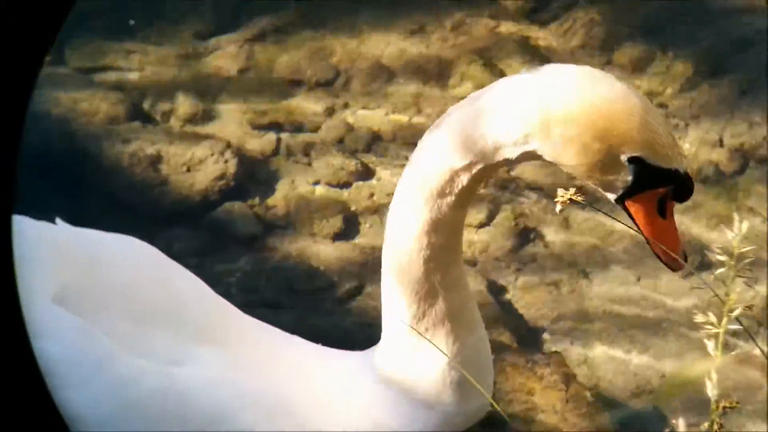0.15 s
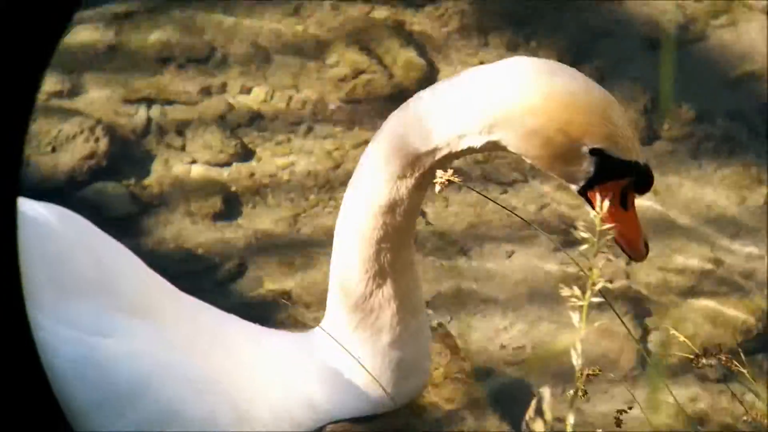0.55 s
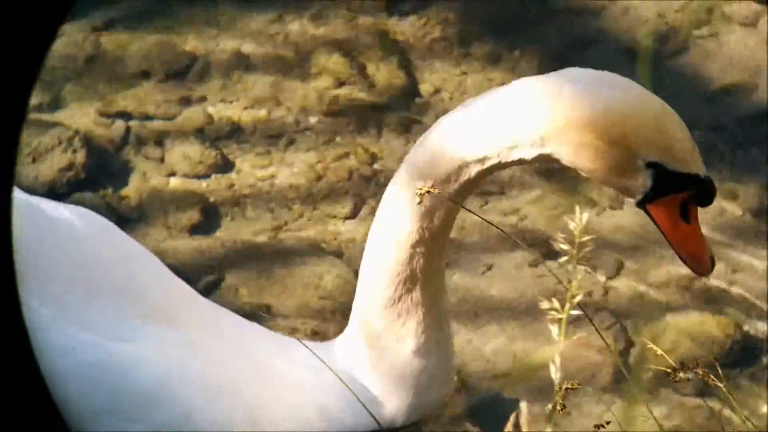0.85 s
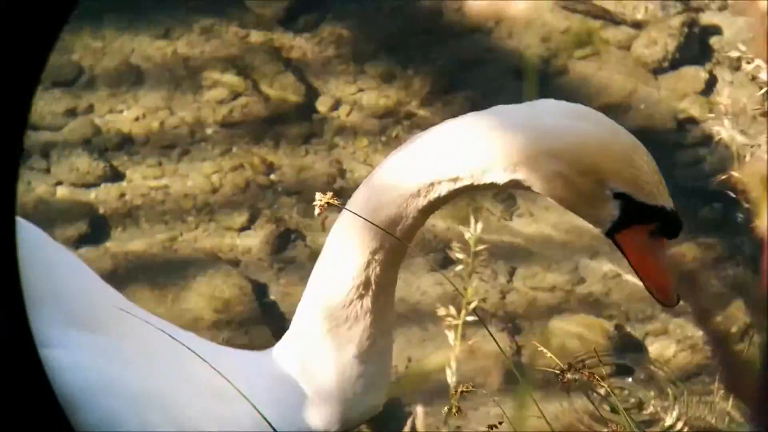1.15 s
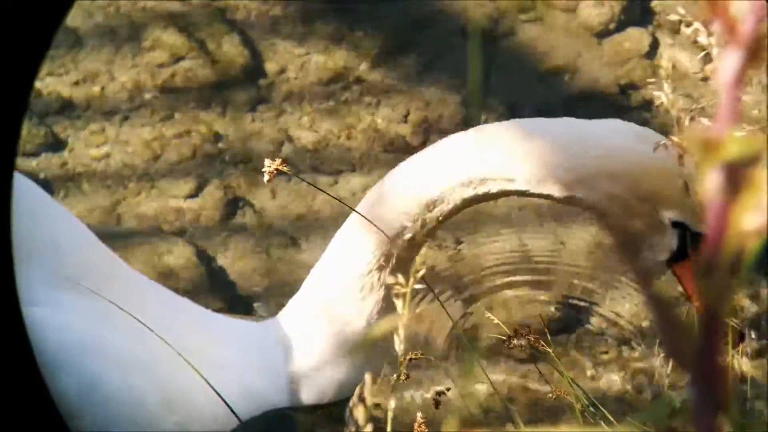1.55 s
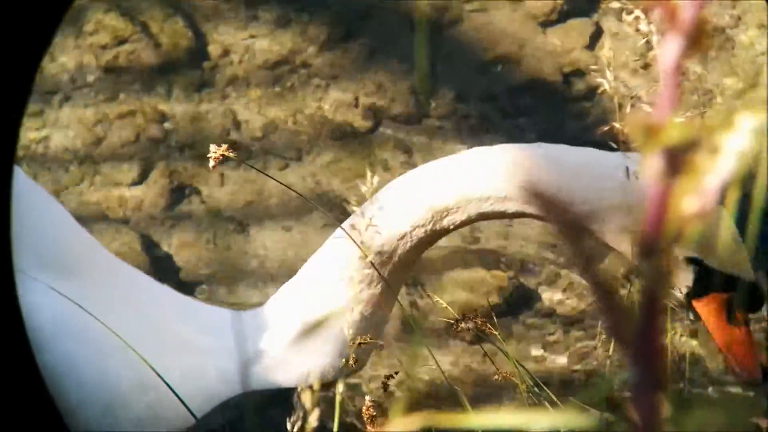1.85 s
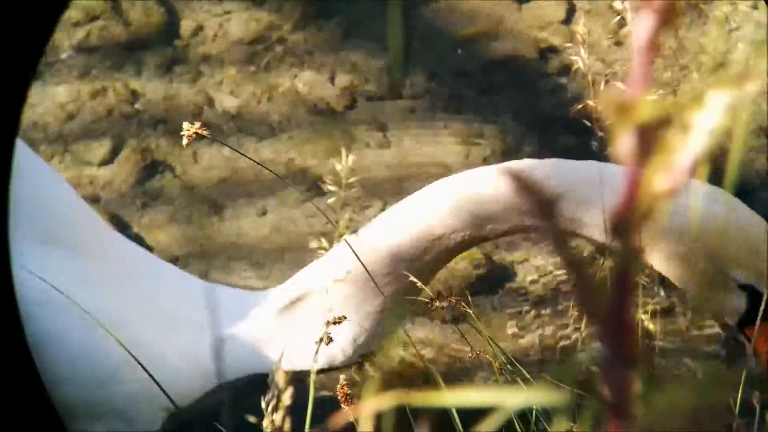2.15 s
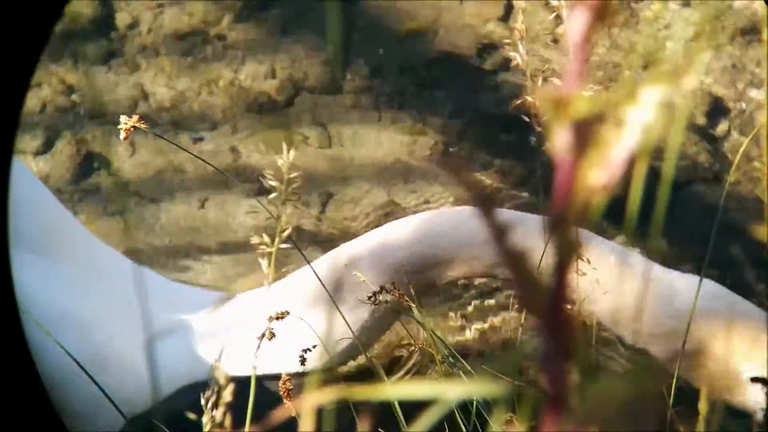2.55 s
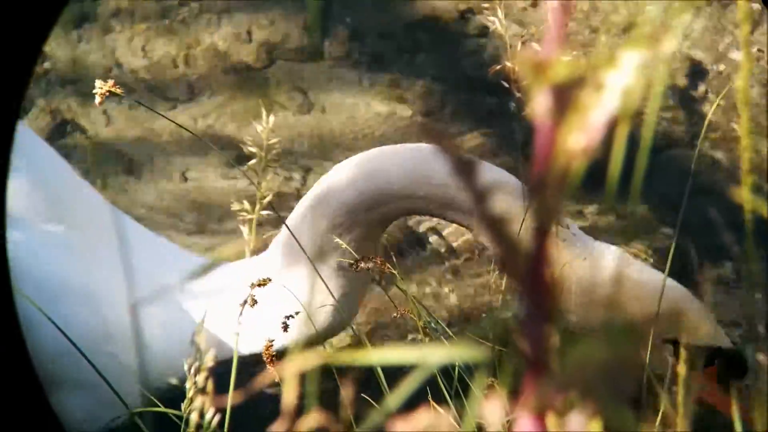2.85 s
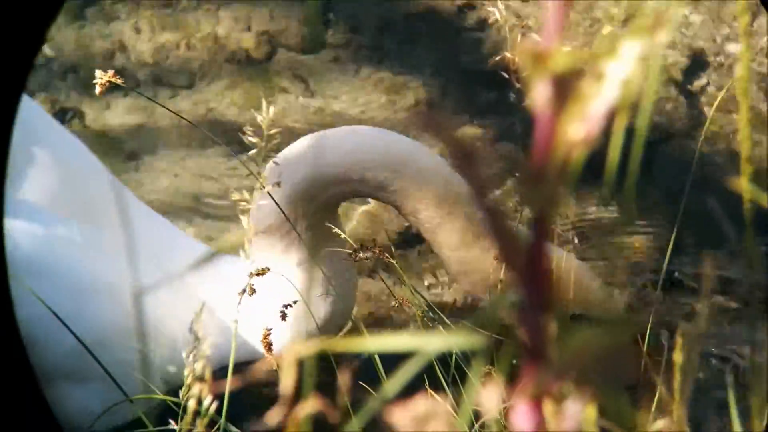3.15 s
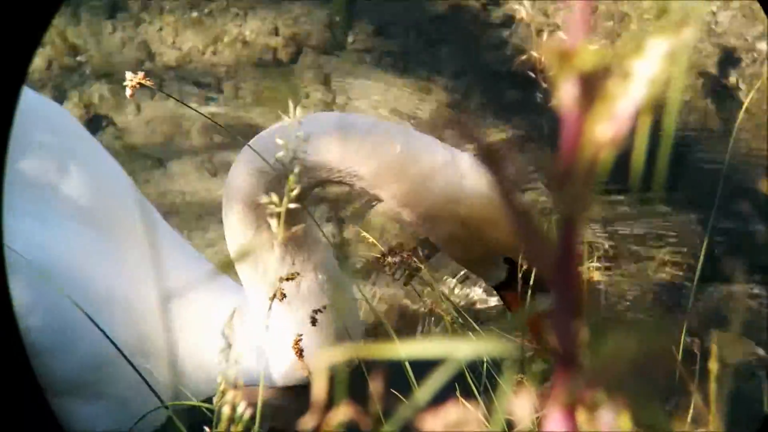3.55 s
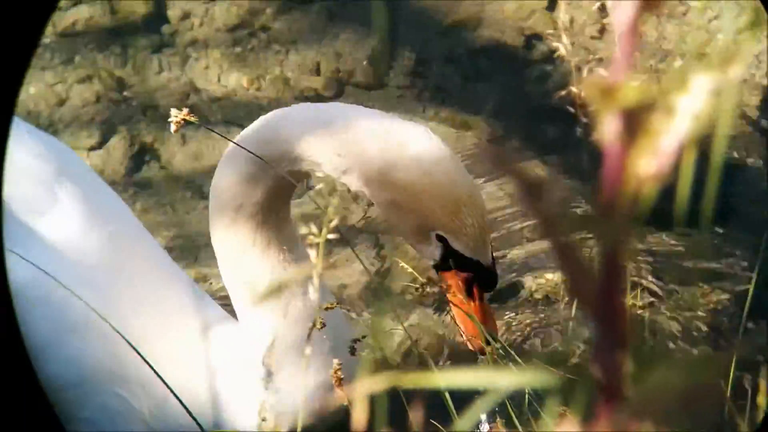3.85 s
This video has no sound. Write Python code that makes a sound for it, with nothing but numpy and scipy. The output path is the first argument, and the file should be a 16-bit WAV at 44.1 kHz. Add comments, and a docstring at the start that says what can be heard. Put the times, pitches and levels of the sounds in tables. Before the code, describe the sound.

A swan hisses, long and breathy, from the start, darkening and sputtering out at about 1.1 seconds. Small wet puffs follow. From 1.5 seconds it snorts, the air flapping unevenly and swelling to a rough rush around 3 seconds, then sinking to a low flutter from 3.4 to 4 seconds. Soft low bumps and quiet outdoor air lie underneath, with two faint ticks near 2.7 and 2.8 seconds.

```python
"""Swan hiss and snort.

A swan forces out one long, breathy hiss that darkens and sputters out. It then snorts:
air flaps unevenly through its wet airway, swells to a rough rush and sinks to a low flutter.
Both are turbulence noise shaped by the airway's resonances.
Soft low bumps, two faint ticks and quiet outdoor air lie underneath."""
import sys
import numpy as np
from scipy import signal
from scipy.fft import rfft, irfft
from scipy.io import wavfile
from scipy.ndimage import uniform_filter1d, map_coordinates

SR = 44100
rng = np.random.default_rng(int(sys.argv[2]) if len(sys.argv) > 2 else 0)


def wrap_up_sound(samples):
    """Save the sound to the file named by the first command line argument, as 16-bit audio."""
    columns = np.atleast_2d(samples).T
    # keep every value between -1 and 1, then stretch to whole-number steps
    tamed = np.clip(columns, -1, 1)
    steps = np.round(tamed * 32767).astype(np.int16)
    wavfile.write(sys.argv[1], SR, steps)


N = 176400
TIME = np.arange(N) / SR
FREQS = np.maximum(np.arange(N // 2 + 1) * SR / N, 1)
WOBBLE_RATIO, WOBBLE_HZ = 0.01884, 12.02   # random wander of the snort and flutter resonances


def hiss(narrow_from_s=0.69, narrow_over_s=0.26, throat_rest_hz=1043.6, rough_db=1, rough_hz=29):
    """Forced air in four gliding bands plus a whistle; the broad bands fade as the sound narrows."""
    # Each row: time in seconds, then throat, middle, edge and treble level in dB before trim.
    levels = [(0.0, -47.5, -43.5, -44.5, -62), (0.048, -47, -49.5, -45, -63),
              (0.104, -42, -47.5, -38.5, -59), (0.216, -38.5, -40, -36.5, -58),
              (0.382, -39, -35, -41.5, -63), (0.492, -34.5, -35.5, -46.5, -61.5),
              (0.554, -37, -36.5, -55, -61.5), (0.712, -40.5, -38.5, -62, -63.5),
              (0.912, -41, -46.5, -84, -70), (1.022, -22, -47, -57, -66), (1.06, -47, -61, -62, -72),
              (1.09, -45, -59, -61, -71), (1.1, -58, -62, -62, -76)]
    # Each row: time in seconds, main throat resonance in Hz.
    throat_track = [(0, 1019), (.3, 1062), (.42, 1165), (.56, 1192), (.68, 1020), (.95, 1041), (1.1, 920)]
    # Each row: resonance in Hz before the glide, width in Hz, relative level in dB.
    throat_modes = [(290, 195, -16), (552, 150, -16), (746, 126, -4.5), (1047, 108, 3.5), (1285, 250, -10)]
    middle_modes = [(1580, 430, -3), (1884, 150, 0.5), (2275, 290, 1.5), (2650, 260, -1.5), (2920, 250, -3)]
    # Each row: frequency in Hz before the glide, relative spectral density in dB.
    edge_spectrum = [(2900, -20), (3400, -6), (3700, 0), (4150, 0.5), (4500, -1.5), (4900, -8.5),
                     (5250, -16), (5650, -46), (6500, -57)]
    treble_spectrum = [(4500, -28), (5500, -17), (6100, -2.5), (7100, 2), (8300, 0), (9300, -10),
                       (10500, -16), (15500, -30)]
    # Each row: time in seconds, frequency ratio.
    middle_edge_glide = [(0, .95), (.25, 1.002), (.5, 1.044), (.7, 1.04), (.9, 0.94)]
    treble_glide = [(0, 0.92), (.3, 0.97), (.7, 1.1), (.85, 1.13), (1.0, 0.97)]
    throat_gain, middle_gain, edge_gain, treble_gain = from_db(curves(levels))
    glide = curves(middle_edge_glide)[0]
    throat_glide = curves(throat_track)[0] / throat_rest_hz
    trim = from_db(0.5)
    throat = throat_gain * trim * stretched(resonant(throat_modes), throat_glide)
    middle = middle_gain * stretched(resonant(middle_modes), glide)
    edge = edge_gain * trim * stretched(coloured(edge_spectrum), glide)
    treble = treble_gain * stretched(coloured(treble_spectrum), curves(treble_glide)[0])
    treble *= 1 - ramp(levels[-1][0], length_s=0.11)
    broad = np.sqrt(1 - ramp(narrow_from_s, narrow_over_s))
    lower = broad * (throat + middle)
    upper = broad * edge + treble + whistle()
    return lower * flicker(rough_db, rough_hz) + upper * flicker(rough_db, rough_hz)


def whistle(centre_hz=4920, width_hz=210, overtone_hz=5500, overtone_width_hz=660):
    """Breath rings in a narrow resonance; a higher one joins as the hiss darkens."""
    # Each row: time in seconds, level in dB.
    levels = [(.1, -62), (.3, -48.5), (.5, -58), (.6, -54.5), (.75, -55), (.86, -64), (.95, -80),
              (1.1, -110)]
    main = from_db(curves(levels)[0]) * resonant([(centre_hz, width_hz, 0)])
    overtone_gain = swell(centre_s=0.77, peak_db=-63.5, length_s=0.28)
    return main + overtone_gain * resonant([(overtone_hz, overtone_width_hz, 0)])


def airway(snort_from_s=1.49, flutter_from_s=3.35, change_s=0.04):
    """Steady flow and flaps rattle through three airway postures: sputter, snort, flutter."""
    # Steady flow per posture. Each row: time in seconds, level in dB before trim.
    sputter_flow = [(.62, -58), (.77, -37.5), (.88, -41), (1.01, -38), (1.09, -45.5), (1.108, -63),
                    (1.18, -55.5), (1.29, -60.5), (1.48, -61)]
    snort_flow = [(1.5, -65.5), (1.66, -59.5), (1.8, -57.5), (1.92, -52.5), (1.98, -43), (2.08, -44),
                  (2.13, -39.5), (2.18, -54), (2.26, -54.5), (2.31, -50.5), (2.37, -47.5), (2.41, -42),
                  (2.6, -42.5), (2.632, -47), (2.66, -41), (2.76, -43.5), (2.8, -66), (2.82, -40),
                  (2.91, -42), (2.98, -37.5), (3.1, -39.5), (3.14, -46.5), (3.19, -41.5), (3.25, -40.5),
                  (3.28, -57), (3.35, -53)]
    flutter_flow = [(3.33, -60), (3.5, -54), (3.7, -52.5), (3.82, -56.5), (3.9, -54.5), (4, -50)]
    # The airway pops open. Each row: centre in seconds, peak in dB before trim, length in seconds.
    flaps = [(.585, -37, 0.0099), (.623, -37, 0.0081), (.72, -36, 0.011), (.928, -37, 0.01),
             (.845, -34.5, 0.0081), (1.137, -42, 0.028), (1.216, -39, 0.0063), (1.272, -47.5, 0.012),
             (1.338, -40.5, .012), (1.408, -57, .03), (1.542, -52.5, 0.021), (1.598, -51, 0.013),
             (1.687, -49.5, 0.011), (1.74, -48, .014), (1.768, -46, 0.01), (1.812, -44.5, 0.0092),
             (1.875, -44, 0.019), (1.945, -44, 0.0098), (1.997, -49, 0.016), (2.116, -35.5, 0.0062),
             (2.203, -41, 0.029), (2.284, -48.5, 0.0087), (2.338, -43, 0.016), (2.477, -38.5, 0.0069),
             (2.493, -38.5, 0.0088), (2.648, -40.5, 0.014), (2.822, -44.5, 0.0071), (2.761, -41.5, 0.029),
             (2.874, -43, .016), (3.297, -44.5, 0.0085), (3.321, -43, 0.0093), (3.425, -49.5, 0.018),
             (3.484, -48, 0.019), (3.528, -44.5, 0.0097), (3.589, -49.5, 0.023), (3.723, -48, 0.021),
             (3.885, -45, 0.011), (3.915, -44, 0.0068), (3.992, -49, 0.051)]
    flap_power = puff_power(flaps)
    snorting, fluttering = ramp(snort_from_s, change_s), ramp(flutter_from_s, change_s)
    postures = [(sputter_flow, -1.5, 1 - snorting, sputter()),
                (snort_flow, -2, snorting * (1 - fluttering), snort()),
                (flutter_flow, -2.5, fluttering, flutter())]
    air = 0
    for flow, trim_db, share, sound in postures:
        power = from_db(curves(flow)[0]) ** 2 + flap_power
        air += from_db(trim_db) * np.sqrt(share * power) * sound
    air += rush()
    rattle = flicker(depth_db=1.4, rate_hz=55)
    grain = flicker(depth_db=1.1, rate_hz=170)
    return air * rattle * grain


def sputter(ring_hz=892, ring_width_hz=99):
    """The airway rings as the hiss ends; the last puffs sound mostly on one resonance."""
    # Each row: resonance in Hz, width in Hz, relative level in dB.
    modes = [(267, 72, -17.5), (558, 200, -7), (882, 106, 5), (1087, 103, 3.5), (1868, 163, -3.5),
             (2325, 180, -11.5), (3150, 400, -21), (3957, 240, -14), (5060, 110, -34), (5440, 220, -23.5),
             (7100, 890, -35)]
    ring_share = 0.91 * ramp(start_s=1.19, length_s=0.02)
    return evened(blend(resonant(modes), resonant([(ring_hz, ring_width_hz, 0)]), ring_share))


def snort():
    """Wobbling airway resonances rise as the snort builds; a hollow ring colours its start."""
    # Each row: resonance at rest in Hz, width in Hz, relative level in dB.
    modes = [(313, 210, -15.5), (585, 350, -16), (863, 79, -3.5), (1061, 137, -5), (1390, 170, -1.5),
             (1647, 182, 2.5), (1845, 118, -3), (2356, 103, -17.5), (2960, 100, -33), (3560, 270, -26),
             (3990, 240, -29), (6000, 2500, -51)]
    hollow_modes = [(287, 110, -6.5), (856, 97, 0.5), (1607, 68, -2.5)]
    # Each row: time in seconds, frequency ratio.
    glide = [(1.5, .93), (1.85, .94), (2.1, 1.003), (2.6, 1.0), (3.1, 1.031)]
    rising = stretched(resonant(modes), curves(glide)[0] + WOBBLE_RATIO * drift(WOBBLE_HZ))
    hollow_share = 0.57 * (1 - ramp(start_s=1.77, length_s=0.187))
    return blend(rising, resonant(hollow_modes), hollow_share)


def rush():
    """Extra resonances open at the height of the snort."""
    # Each row: resonance in Hz, width in Hz, relative level in dB.
    modes = [(690, 340, 3), (1200, 170, 0), (2010, 120, 3), (2355, 115, 0.5), (3630, 190, -8.5)]
    return swell(centre_s=3.026, peak_db=-49, length_s=0.25) * resonant(modes)


def flutter():
    """The last of the breath rings in wobbling airway resonances."""
    # Each row: resonance at rest in Hz, width in Hz, relative level in dB.
    modes = [(263, 160, -6), (504, 170, -7), (839, 104, 1.5), (995, 36, -1), (1380, 107, -3.5),
             (1640, 153, 0.5), (2228, 180, 1), (3890, 195, -16), (4800, 400, -42)]
    return stretched(resonant(modes), 1 + WOBBLE_RATIO * drift(WOBBLE_HZ))


def bumps():
    """Soft, short swells of low noise."""
    # Each row: centre in seconds, peak in dB, length in seconds.
    events = [(.01, -44, 0.021), (.115, -44.5, 0.043), (.305, -48.5, 0.024), (.695, -49, 0.015),
              (2.135, -63, 0.024), (2.625, -54.5, 0.02), (2.75, -56.5, 0.024), (3.205, -54, 0.035),
              (3.3, -51.5, 0.032), (3.9, -67, 0.049)]
    # Each row: frequency in Hz, relative spectral density in dB.
    spectrum = [(30, -19), (65, -9), (130, -6.5), (220, -5), (320, 0.5), (450, -5.5), (800, -26)]
    return np.sqrt(puff_power(events)) * coloured(spectrum)


def ticks():
    """Two faint bursts of bright noise."""
    # Each row: centre in seconds, peak in dB, length in seconds.
    events = [(2.691, -68, .0035), (2.815, -74, 0.0098)]
    # Each row: frequency in Hz, relative spectral density in dB.
    spectrum = [(1500, -20), (4000, -6), (8000, 5), (15000, -8)]
    return np.sqrt(puff_power(events)) * coloured(spectrum)


def outdoor_air(level_db=-64, rumble_below_hz=350):
    """Quiet background noise with a lumpy low end."""
    # Each row: frequency in Hz, relative spectral density in dB.
    spectrum = [(20, -33), (38, -16), (55, 2), (120, -2), (260, 0.5), (450, -7.5), (850, -4.5),
                (1400, -11.5), (2500, -16), (5000, -25.5), (9000, -30), (15500, -32)]
    air = from_db(level_db) * coloured(spectrum)
    rumble = signal.sosfiltfilt(signal.butter(2, rumble_below_hz, fs=SR, output="sos"), air)
    return air + rumble * (flicker(depth_db=-3, rate_hz=13.6) - 1)


def resonant(modes, gurgle_db=3.5, gurgle_hz=20):
    """Turbulence in steep-sided resonances, each gurgling on its own; unit rms."""
    total = 0
    for hz, width_hz, db in modes:
        detuning = (FREQS ** 2 - hz ** 2) / (2 * FREQS * width_hz)
        band = noise(1 / (1 + 2 * detuning ** 2))
        total += from_db(db) * np.sqrt(width_hz) * band * flicker(gurgle_db, gurgle_hz)
    return evened(total)


def evened(x, window_s=0.015, strength=0.67):
    """Evens out the noise's short-term level so it sounds steady, without stray bursts; unit rms."""
    size = int(window_s * SR)
    power = uniform_filter1d(uniform_filter1d(x ** 2, size), size) + 1e-12
    return unit_rms(x / power ** (strength / 2))


def coloured(spectrum):
    """Unit-rms noise through (Hz, dB) points, falling away outside them."""
    hz, db = np.transpose(spectrum)
    skirts = np.minimum(FREQS / hz[0], 1) ** 2 * np.minimum(hz[-1] / FREQS, 1) ** 2
    return noise(from_db(np.interp(np.log(FREQS), np.log(hz), db)) * skirts)


def noise(gains):
    """Unit-rms noise shaped by a gain per frequency."""
    return unit_rms(irfft(rfft(rng.standard_normal(N)) * gains, N))


def drift(rate_hz):
    """Random wander, softly bounded at +/-2."""
    ratio = FREQS / rate_hz
    return 2 * np.tanh(noise(ratio / (1 + ratio ** 2) ** 2) / 2)


def flicker(depth_db, rate_hz):
    """Random gain of unit power."""
    return unit_rms(from_db(depth_db * drift(rate_hz)))


def stretched(x, ratio):
    """Scales all frequencies by a time-varying ratio."""
    return map_coordinates(x, [np.cumsum(ratio)], order=3, mode="wrap")


def swell(centre_s, peak_db, length_s):
    """Bell-shaped gain; length is the width at half power."""
    offset = 2 * (TIME - centre_s) / length_s
    return from_db(peak_db) * 0.5 ** (np.minimum(offset ** 2, 100) / 2)


def puff_power(rows):
    """Summed power of one swell per row."""
    return sum(swell(*row) ** 2 for row in rows)


def blend(a, b, b_share):
    """Equal-power mix."""
    return np.sqrt(1 - b_share) * a + np.sqrt(b_share) * b


def curves(rows):
    """Each value column of a time table, interpolated per sample."""
    times_s, *columns = np.transpose(rows)
    return [np.interp(TIME, times_s, column) for column in columns]


def ramp(start_s, length_s):
    """Linear rise from 0 to 1."""
    return np.clip((TIME - start_s) / length_s, 0, 1)


def from_db(db):
    """Decibels to gain."""
    return 10 ** (np.asarray(db) / 20)


def unit_rms(x):
    """Scales to unit rms."""
    return x / np.sqrt(np.mean(x ** 2) + 1e-20)


def scene():
    """The swan and its surroundings, in mono."""
    return (hiss() + airway() + outdoor_air() + bumps() + ticks())[None]


def record(dry, cutoff_hz=15750):
    """Steep low-pass."""
    return signal.sosfilt(signal.ellip(12, .1, 80, cutoff_hz, fs=SR, output="sos"), dry)


dry = scene()
out = record(dry)
wrap_up_sound(out)
```